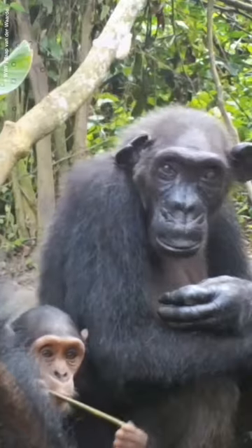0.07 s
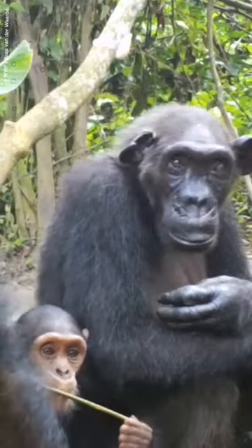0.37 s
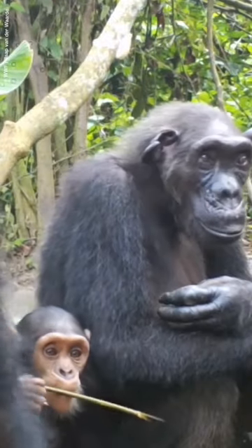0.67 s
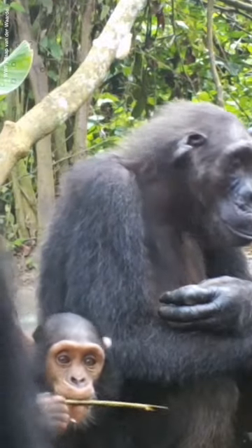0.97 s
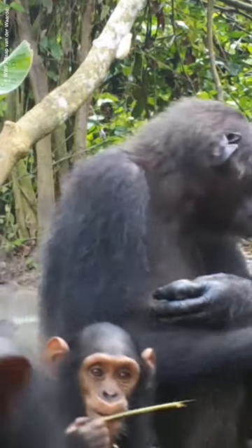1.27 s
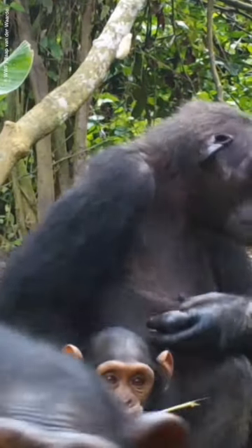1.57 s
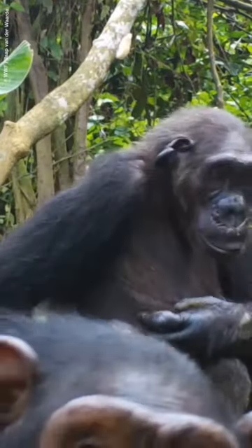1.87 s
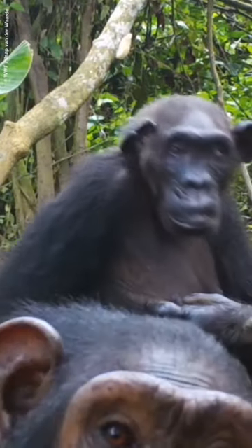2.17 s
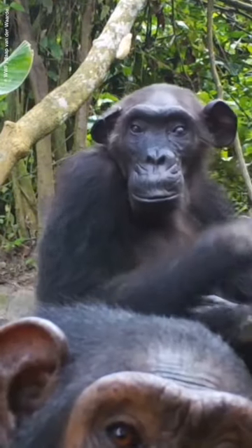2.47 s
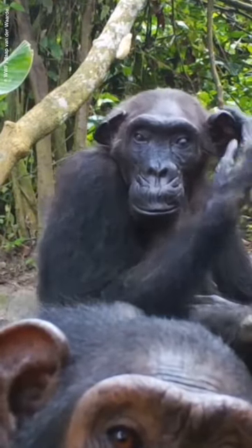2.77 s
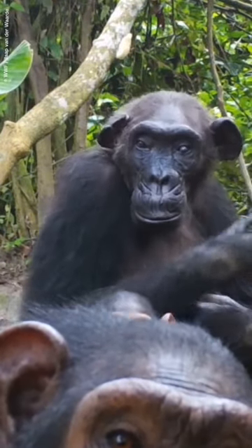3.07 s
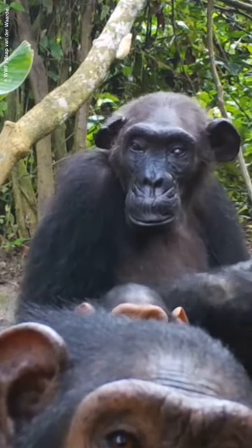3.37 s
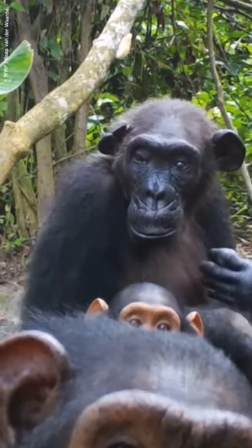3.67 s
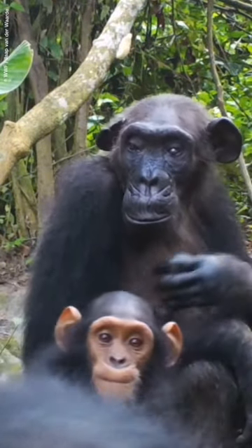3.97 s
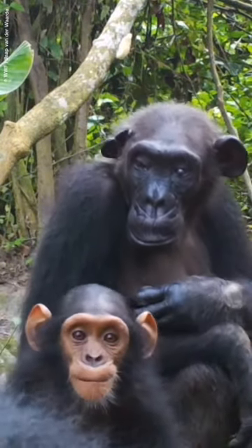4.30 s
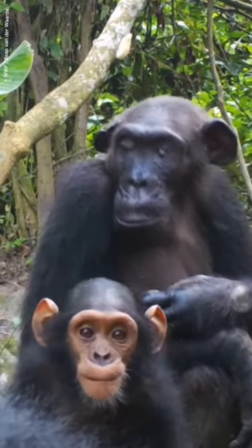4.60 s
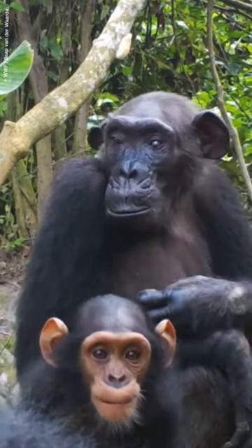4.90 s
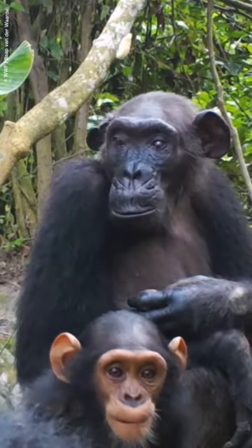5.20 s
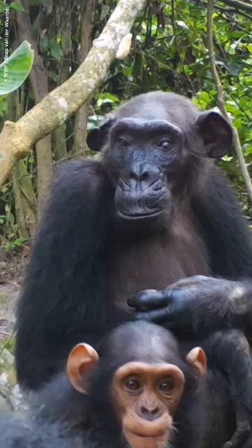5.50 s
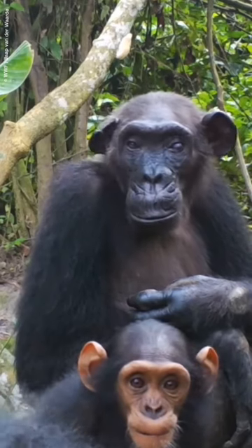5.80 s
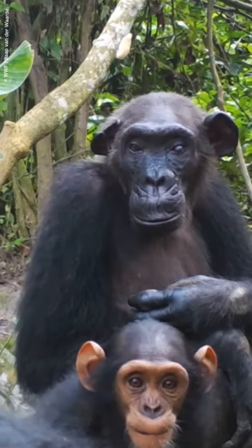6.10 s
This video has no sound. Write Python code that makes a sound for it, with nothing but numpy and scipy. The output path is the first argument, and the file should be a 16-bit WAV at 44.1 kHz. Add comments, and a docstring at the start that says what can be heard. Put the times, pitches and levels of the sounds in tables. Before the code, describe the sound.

A high, pulsing chorus of crickets fills a forest, broken by crackling leaves and twig snaps as chimpanzees move nearby.

```python
"""A shrill chorus of crickets fills a forest: one chirps close by, many more chirp and trill among trees.
Each stridulates, drawing a file over a scraper, and trunks and leaves scatter the tone into echoes.
Chimpanzees shift on the litter in front: leaves fracture in clicks, twigs snap, a limb bumps the soil.
Far birds whistle a few times over soft forest air, a faint low hum and the hiss of distant insects."""
import sys
import numpy as np
from scipy import signal
from scipy.fft import rfft, irfft
from scipy.io import wavfile
from scipy.ndimage import uniform_filter1d

SR = 44100
rng = np.random.default_rng(int(sys.argv[2]) if len(sys.argv) > 2 else 0)


def persist_wave(psi):
    """Save psi, clipped to +-1, as 16-bit WAV."""
    counts = np.round(np.clip(psi, -1, 1) * 32767).astype(np.int16)
    wavfile.write(sys.argv[1], SR, np.atleast_2d(counts).T)


N = 275625
TIME = np.arange(N) / SR


def chorus(flutter_db=1.25, trim_db=-0.5):
    """Incoherent superposition: far crickets, each at its own pitch and pace, swell and ebb as one."""
    # far crickets: top f/Hz, chirp rate/(1/s), relative level/dB
    crickets = [(5833, 7.9, -12), (6025, 7.7, -8.5), (6104, 7.6, -0.5), (6110, 8.2, -6.5),
                (6184, 6.8, -1.5), (6230, 8.1, -0.5), (6330, 7.2, 2), (6420, 6.3, -2.5), (6447, 6.7, -3),
                (6550, 6.9, -7)]
    # slow envelope of their sum: t/s, level/dB before flutter and trim
    swell = [(0.15, -44.5), (0.7, -46), (1.3, -43), (2.25, -45), (2.9, -44.5), (3.4, -42.5), (3.7, -43.5),
             (4.25, -44.4), (4.65, -45.8), (5.4, -42.5), (6.2, -43.5)]
    song = 0
    for hz, per_s, db in crickets:
        phase = cycle(per_s, jitter=0.0697, jitter_per_s=2.02) / .6   # sounds for 60 % of each cycle
        voice = chirp(phase, hz + 15 * drift(4), rise_hz=113.6, rasp=0.61, rasp_rate=204, edge=0.16)
        song = song + from_db(db + 1.4 * drift(6.1)) * voice
    song = forest(song, wet_db=-4.5, t60=1.0)
    running_rms = np.sqrt(uniform_filter1d(song ** 2, size=3000) + 1e-12)
    swell_db = np.interp(TIME, *np.transpose(swell)) + flutter_db * drift(15)
    return song / running_rms * from_db(swell_db + trim_db)


def near_cricket():
    """Stridulation at close range: direct sound dominates in rising chirps, about seven a second."""
    # runs of chirps: first t/s, last t/s, level/dB
    runs = [(.270, .803, -43.5), (1.308, 1.580, -45), (2.112, 2.520, -44.5), (2.745, 3.568, -46.5),
            (4.123, 4.405, -45), (4.937, 5.602, -45.5), (6.207, 6.342, -48)]
    phase, gain = beat(runs, period_s=.135, length_s=.072, uneven_db=0.05)
    song = gain * chirp(phase, top_hz=6605, rise_hz=147.8, rasp=0.2, rasp_rate=160, edge=0.33)
    return forest(song, wet_db=-7, t60=.2)


def low_cricket(warm_up_s=3.2, warm_up_db=4):
    """Stridulation at a lower, nearly constant frequency: three soft chirps a second gather strength."""
    # one long run of chirps: first t/s, last t/s, level/dB at full voice
    runs = [(.395, 5.283, -57.5)]
    phase, gain = beat(runs, period_s=.325, length_s=0.141, uneven_db=0.8)
    warm_up = from_db(-warm_up_db * np.maximum(1 - TIME / warm_up_s, 0))
    song = warm_up * gain * chirp(phase, top_hz=4507, rise_hz=10, rasp=.35, rasp_rate=45, edge=.48)
    return forest(song, wet_db=-7, t60=.3)


def trillers():
    """Continuous stridulation: unbroken pulse trains add in and under the chorus."""
    # trilling crickets: f/Hz, stroke rate/(1/s), frequency waver/Hz, level/dB
    trills = [(6100, 6.2, 12, -56.5), (5005, 35, 8.97, -63.5), (5030, 27, 8, -64), (5092, 21, 8, -61),
              (5150, 14, 9, -62.5), (4562, 13, 26, -71.5), (2940, 41, 50, -79.5), (2808, 29, 55, -82.5)]
    song = sum(from_db(db + 1.5 * drift(3)) * trill(hz, per_s, waver_hz, duty=.8)
               for hz, per_s, waver_hz, db in trills)
    return forest(song, wet_db=-2.5, t60=0.22)


def fast_triller():
    """A gated pulse train: a closer cricket with crisp, quick strokes sings in bouts."""
    # bouts of song: start t/s, end t/s, level/dB
    bouts = [(0.0, 0.488, -59.5), (2.392, 3.51, -59.5), (6.0, 6.3, -65)]
    gate = sum(from_db(db) * arch((TIME - start) / (end - start), edge=0.061) for start, end, db in bouts)
    song = gate * trill(hz=5324, per_s=37.5, waver_hz=12, duty=.72)
    return forest(song, wet_db=-7, t60=0.22)


def chirp(phase, top_hz, rise_hz, rasp, rasp_rate, edge):
    """Tooth rate sets pitch: it climbs as the file speeds up over the scraper; uneven teeth add rasp."""
    hz = top_hz - rise_hz * (1 - np.clip(phase, 0, 1)) ** 2
    carrier = tone(hz + 14 * drift(62.4))
    roughness = (1 + rasp * drift(rasp_rate)) / np.sqrt(1 + rasp ** 2)
    return arch(phase, edge) * carrier * roughness


def trill(hz, per_s, waver_hz, duty):
    """Pulse modulation: each wing stroke radiates a short tone that sags in pitch."""
    stroke = cycle(per_s, jitter=0.0186, jitter_per_s=3.2)
    carrier = tone(hz - 30 * (stroke - duty / 2) + waver_hz * drift(30.8))
    return rms_one(arch(stroke / duty, edge=0.31) * carrier)


def cycle(per_s, jitter, jitter_per_s):
    """Phase is the integral of rate: progress 0..1 through each cycle of a slightly unsteady rhythm."""
    rate = per_s * (1 + jitter * drift(jitter_per_s))
    return (np.cumsum(rate) / SR + rng.random()) % 1


def beat(runs, period_s, length_s, uneven_db):
    """Periodic chirps fill each run; gives the nearest chirp's phase (0..1 while it sounds) and gain."""
    centres, db = np.transpose([(s, db) for first, last, db in runs
                                for s in np.linspace(first, last, round((last - first) / period_s) + 1)])
    nearest = np.searchsorted((centres[1:] + centres[:-1]) / 2, TIME)
    gains = from_db(db + uneven_db * rng.standard_normal(len(centres)))
    return (TIME - centres[nearest]) / length_s + .5, gains[nearest]


def forest(x, wet_db, t60):
    """Reverberation by scattering: trunks and leaves return an exponentially dying cloud of echoes."""
    t = TIME[:SR // 2]
    echoes = rng.standard_normal(len(t)) * from_db(-60 * t / t60)
    cloud = rms_one(signal.fftconvolve(x, echoes)[:N]) * np.std(x)
    wet = from_db(wet_db)
    return (x + wet * cloud) / np.sqrt(1 + wet ** 2)


def rustles(range_db=22.5):
    """Crackling noise: limbs drag over the litter and crush it in uneven clumps of tiny fractures."""
    # pushes of a limb: peak t/s, rise t/s, fall t/s, then leaf, stalk and ground drive level/dB
    pushes = [(1.331, 0.012, .030, -53, -49, -67), (1.350, 0.023, 0.042, -44.5, -43, -61.5),
              (1.430, 0.012, 0.033, -53, -48, -59), (1.471, 0.045, 0.054, -49.5, -45, -55.5),
              (1.500, 0.041, 0.17, -52.5, -52.5, -63), (1.597, .005, 0.015, -51, -49, -57.5),
              (1.763, 0.048, 0.041, -46.5, -49.5, -66), (1.815, .004, 0.039, -52, -54, -66),
              (3.184, .060, 0.06, -64, -58.5, -70), (3.982, 0.051, 0.17, -61, -60, -72),
              (4.385, 0.095, .100, -63.5, -65, -71), (4.511, .012, 0.028, -61, -48.5, -66),
              (4.864, 0.029, .060, -56, -78, -85), (5.550, 0.29, 0.17, -58, -52.5, -61),
              (5.690, 0.1, 0.047, -54, -67, -68), (5.772, 0.0096, 0.043, -44.5, -49, -53),
              (5.850, 0.038, 0.087, -55, -58, -69.5), (6.231, 0.026, .120, -52.5, -56, -57.5)]
    leaf, stalk, ground = np.zeros((3, N))
    for s, rise_s, fall_s, *levels in pushes:
        from_peak = np.maximum((s - TIME) / rise_s, (TIME - s) / fall_s)
        push = from_db(-range_db * np.minimum(from_peak, 10))
        for gain, db in zip((leaf, stalk, ground), levels):
            gain += from_db(db) * push
    clumps = rms_one(from_db(2.5 * drift(130)))
    leaf, stalk, ground = leaf * clumps, stalk * clumps, ground * clumps
    mid = litter(leaf * grains(6000, 2.0), stalk * grains(5000, 3.8), ground * grains(4000, 1.9))
    side = from_db(-4.5) * band(leaf * grains(9000, 3.7), 6240, 10600, order=5)
    return stereo(mid, side)


def snaps(splinter_db=-12, splinter_s=0.00061, tail_db=-27, tail_s=0.0082, thud_s=0.0033):
    """Brittle fracture: a twig gives way in one impulse and a few splinters; nearby leaves shiver."""
    # twig snaps and knocks: t/s, then crack, stalk and thud drive level/dB
    fractures = [(0.404, -46, -39, -79), (1.349, -27, -32, -69), (1.4252, -42, -24.5, -52),
                 (1.4718, -40, -32, -61), (1.594, -28, -26, -61), (1.649, -33.5, -32.5, -78),
                 (1.732, -25.5, -25, -55.5), (1.760, -41, -24, -56), (1.771, -39, -34, -55),
                 (1.797, -26, -30, -48.5), (1.811, -17.5, -35, -65), (1.955, -39, -37, -70),
                 (2.008, -35.5, -55, -69), (2.400, -41, -59, -65), (2.763, -37.5, -37, -57.5),
                 (3.0075, -54, -28.5, -62), (3.969, -41, -47, -72), (3.982, -32.5, -42, -64),
                 (4.007, -36, -56, -74), (5.238, -32.5, -33, -58), (5.558, -29.5, -42, -63),
                 (5.7704, -34, -27, -60), (5.7745, -44, -25, -46), (6.083, -33, -59, -78)]
    leaf, stalk, ground = np.zeros((3, N))
    t = TIME[:SR // 16]
    crack = t == 0
    shiver = from_db(splinter_db) * np.exp(-t / splinter_s) + from_db(tail_db) * np.exp(-t / tail_s)
    give = np.exp(-t / thud_s)   # the soil yields more slowly
    for s, crack_db, stalk_db, thud_db in fractures:
        at = slice(round(s * SR), round(s * SR) + len(t))
        noise = rng.standard_normal((3, len(t)))
        leaf[at] += from_db(crack_db) * (crack + shiver * noise[0])
        stalk[at] += from_db(stalk_db) * (crack + shiver * noise[1])
        ground[at] += from_db(thud_db) * (crack + give * noise[2])
    side = from_db(-24) * band(leaf, 5600, 11700, order=4)
    return stereo(litter(leaf, stalk, ground), side)


def grains(per_s, spread_db):
    """Shot noise: tiny fractures of dry leaves make random clicks of very uneven size."""
    sizes = from_db(spread_db * np.minimum(rng.exponential(1, N), 4)) * rng.choice([-1, 1], N)
    return rms_one(sizes * (rng.random(N) < per_s / SR))


def litter(leaf, stalk, ground):
    """Broad resonances: leaves crackle high, stalks ring in the middle, the soil answers low."""
    crackle = signal.lfilter([.7], [1, -.36], band(leaf, 4640, 9800))   # gentle low-pass
    return 1.51 * crackle + band(stalk, 3450, 6360) + band(ground, 350, 1700, order=1)


def bump(onset_s=5.774, level_db=-54.5):
    """Damped modes: a limb lands softly and heavily, and the vibration dies at once in the soil."""
    # modes of the impact: f/Hz, relative level/dB, 60 dB decay t/s
    modes = [(269, 0.5, 0.071), (388, 0.5, 0.088), (677, 1, 0.062), (1200, 8, 0.028), (1690, -3, 0.033)]
    t = np.maximum(TIME - onset_s, 0)
    return sum(from_db(level_db + db - 60 * np.minimum(t / t60, 2)) * np.sin(2 * np.pi * hz * t)
               for hz, db, t60 in modes)


def birds(length_s=0.131):
    """Linear frequency sweeps: thin whistles from deep in the trees, about half their power in echoes."""
    # whistles: middle t/s, level/dB, starting f/Hz, rise in f/Hz
    whistles = [(.54, -71.5, 3210, 447), (1.24, -71, 3160, 455), (2.56, -71.5, 3270, 430),
                (4.435, -79, 1290, 90)]
    song = 0
    for s, db, start_hz, rise_hz in whistles:
        phase = np.clip((TIME - s) / length_s + .5, 0, 1)
        song = song + from_db(db) * arch(phase, edge=0.21) * tone(start_hz + rise_hz * phase)
    return forest(song, wet_db=1, t60=0.33)


def background(air_db=-70, hiss_db=-56):
    """Ambient noise: countless far insects sum incoherently to a hiss over forest air and a faint hum."""
    # spectrum of still forest air: f/Hz, relative density level/dB
    air_spectrum = [(12, -36), (20, 0.5), (60, -0.5), (123, -3), (204, -6), (572, -13), (646, -13.5),
                    (807, -14.5), (1010, -15.5), (2500, -18), (3250, -19.5), (5500, -120)]
    # partials of the low hum: f/Hz, level/dB
    partials = [(90, -83), (120, -79.5), (150, -85.5)]
    # spectrum of the insect hiss: f/Hz, relative density level/dB
    hiss_spectrum = [(2000, -17), (2600, -17), (3250, -12.5), (3600, -12.5), (4200, -8), (4800, -14),
                     (5480, -8.5), (6200, 9), (6750, 5), (7050, -3.5), (7800, -8), (8400, -11.5),
                     (9200, -16), (13000, -18.5)]
    # difference between the ears in that hiss: f/Hz, side level/dB relative to mid
    hiss_width = [(5500, -61), (6600, -47), (7100, -6.5), (7800, -7), (9500, -3.5), (13000, -6.5)]
    air = from_db(air_db) * rms_one(colour(rng.standard_normal(N), air_spectrum))
    hum = sum(from_db(db + 2 * drift(1.5)) * tone(hz + 1.21 * drift(4.65)) for hz, db in partials)
    mid, side = (rms_one(colour(noise, hiss_spectrum)) for noise in rng.standard_normal((2, N)))
    hiss = from_db(hiss_db + drift(20.0)) * stereo(mid, colour(side, hiss_width))
    return air + hum + hiss


def from_db(db):
    """Amplitude ratio of a level: tenfold for every 20 dB."""
    return 10 ** (np.asarray(db) / 20)


def rms_one(x):
    """Normalisation to unit mean power."""
    return x / np.sqrt(np.mean(x ** 2) + 1e-20)


def drift(hz):
    """Random modulation of rms 1: noise through two low-pass poles at the given frequency."""
    step, settle = 40, 2000   # audio samples per noise value; values skipped while the filter settles
    pole = np.exp(-2 * step * np.pi * hz / SR)
    noise = rng.standard_normal(N // step + settle + 2)
    slow = signal.lfilter([1], [1, -2 * pole, pole * pole], noise)[settle:]
    return np.interp(np.arange(N) / step, np.arange(len(slow)), rms_one(slow))


def colour(x, points):
    """Zero-phase filtering by a curve of (f/Hz, level/dB) points."""
    hz, db = np.transpose(points)
    bins = np.maximum(np.fft.rfftfreq(N, 1 / SR), 1)
    return irfft(rfft(x) * from_db(np.interp(np.log(bins), np.log(hz), db)), N)


def band(x, low_hz, high_hz, order=2):
    """Causal band-pass filtering that keeps the power of white noise."""
    sos = signal.butter(order, [low_hz, min(high_hz, .45 * SR)], "band", fs=SR, output="sos")
    return signal.sosfilt(sos, x + 1e-18) * np.sqrt(SR / 2 / (high_hz - low_hz))


def stereo(mid, side):
    """Sum and difference give the left and right channels."""
    return np.array([mid + side, mid - side])


def tone(hz):
    """A sine of rms 1 whose phase integrates a frequency curve."""
    return np.sqrt(2) * np.sin(2 * np.pi * (np.cumsum(hz * np.ones(N)) / SR + rng.random()))


def arch(phase, edge):
    """A window over phase 0..1 with raised-cosine edges, silent outside."""
    return np.sin(np.pi / 2 * np.clip(np.minimum(phase, 1 - phase) / edge, 0, 1)) ** 2


def scene():
    """Linear superposition: the pressures of all sources add."""
    crickets = near_cricket() + chorus() + low_cricket() + trillers() + fast_triller()
    return crickets + birds() + rustles() + snaps() + bump() + background()


def record(dry, start_s=0.087, fade_s=0.022, cutoff_hz=13200):
    """Gating and band limiting: a quick fade-in follows a silent moment; the top is cut steeply."""
    fade_in = np.clip((TIME - start_s) / fade_s, 0, 1)
    low_pass = signal.ellip(10, .2, 80, cutoff_hz, fs=SR, output="sos")
    return signal.sosfilt(low_pass, dry * fade_in)


dry = scene()
out = record(dry)
persist_wave(out)
```